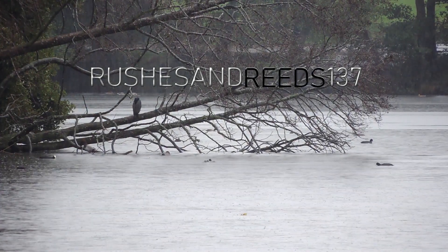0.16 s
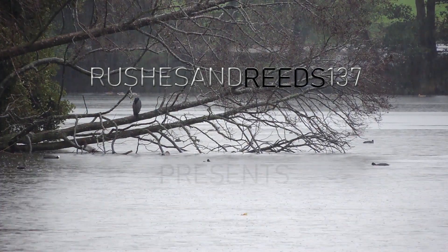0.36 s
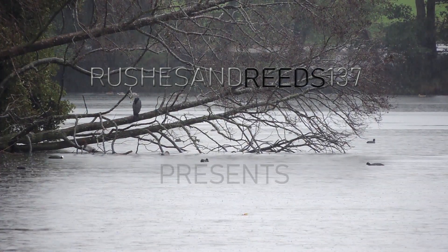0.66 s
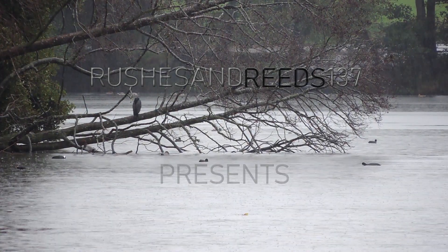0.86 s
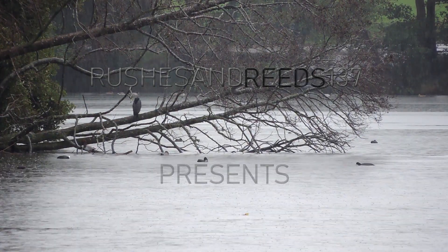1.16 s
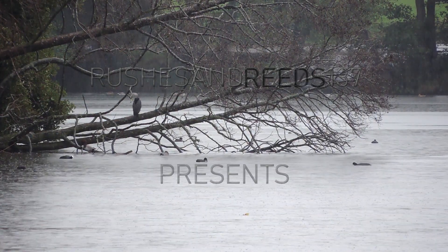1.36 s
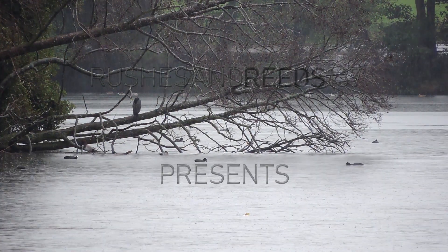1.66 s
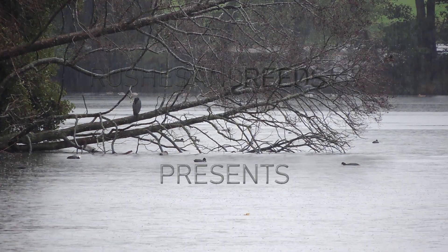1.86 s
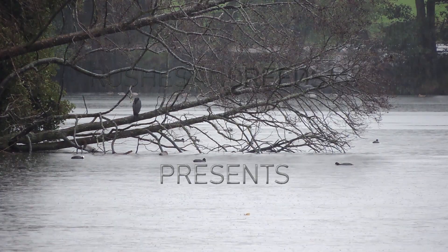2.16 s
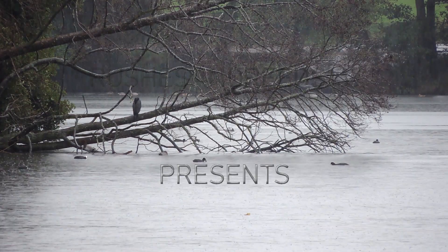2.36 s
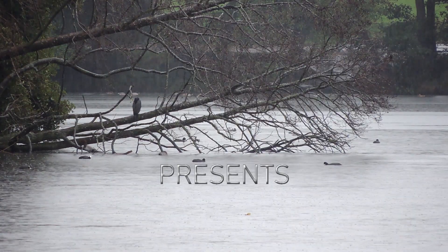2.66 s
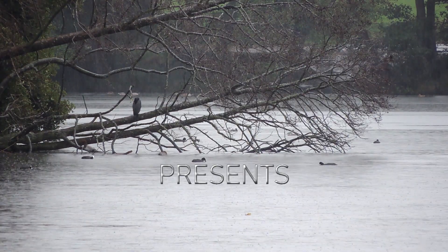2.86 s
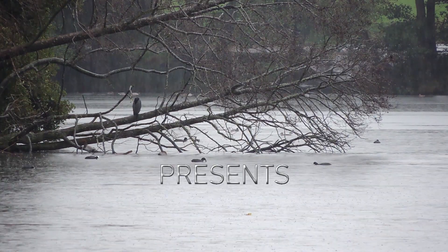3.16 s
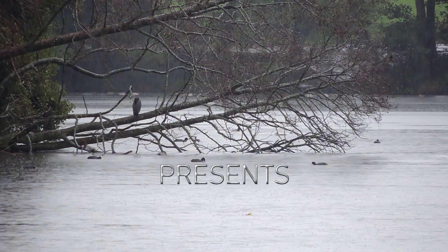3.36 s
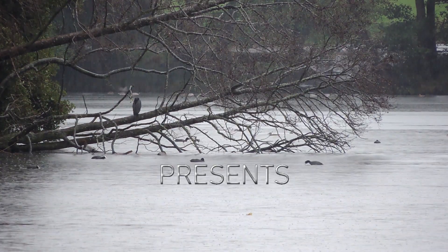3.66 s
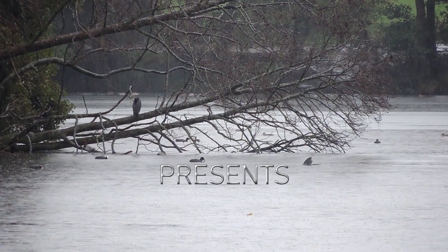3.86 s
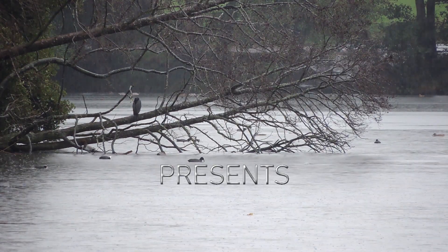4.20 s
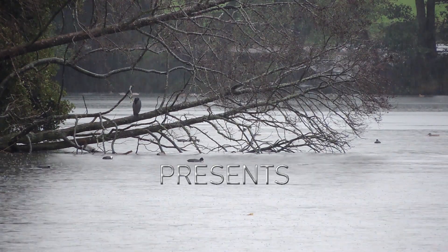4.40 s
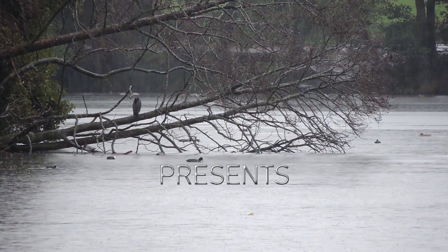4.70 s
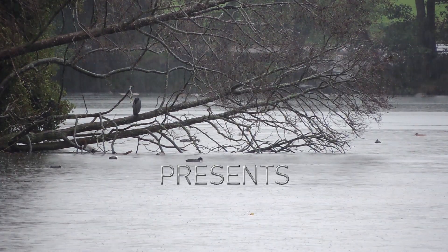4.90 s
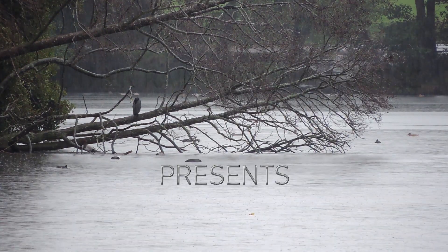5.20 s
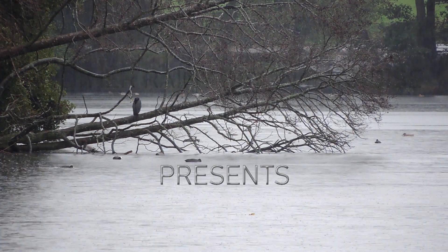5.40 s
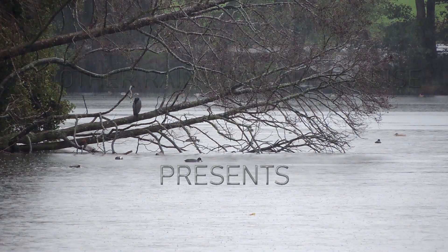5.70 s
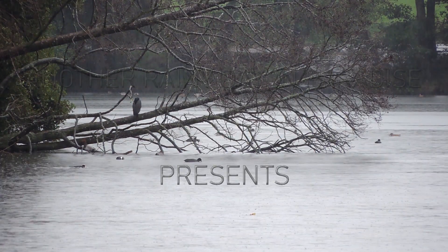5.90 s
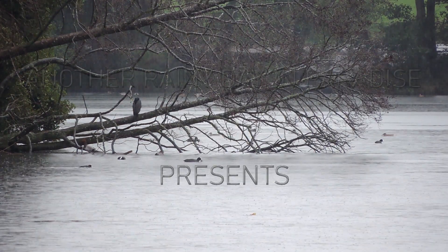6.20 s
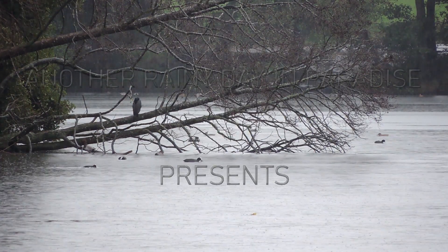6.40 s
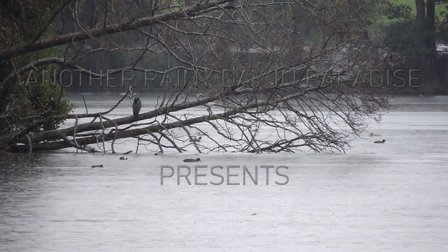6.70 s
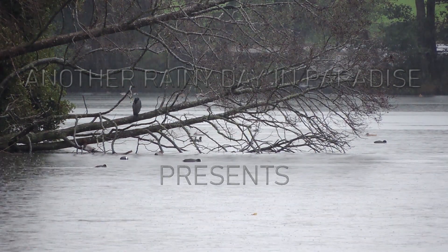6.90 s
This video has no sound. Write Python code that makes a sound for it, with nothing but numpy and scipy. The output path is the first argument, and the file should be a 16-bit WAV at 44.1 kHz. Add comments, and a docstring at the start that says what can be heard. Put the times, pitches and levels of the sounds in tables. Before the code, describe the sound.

Steady rain on a park lake, heard in wide stereo from the bank. Countless far drops blend into a soft wash and bright hiss, with fine pattering and fizzing nearer. Fat drops tick irregularly on leaves and twigs to left and right, a couple knocking a bough dully. Very low, faint traffic rumbles far behind. The sharpest tick comes near the end.

```python
"""Steady rain on a lake in a park, heard from the bank: shaped noise over sparse damped resonances.
It starts a little lighter and picks up within half a second to a wash and hiss of countless far drops.
Nearer drops patter and fizz throughout as short damped rings; fat ones tick on leaves and twigs close by,
and a bough sounds its own note near 1.7 s and again near 3 s. Distant traffic, as low noise, rumbles
underneath; one engine's faint hum, a wavering tone, swells to about 6.5 s. The strongest tick is at 6.3 s."""
import sys
import numpy as np
from scipy import signal
from scipy.fft import rfft, irfft, next_fast_len
from scipy.io import wavfile
from scipy.ndimage import uniform_filter1d, map_coordinates

SR = 44100
rng = np.random.default_rng(int(sys.argv[2]) if len(sys.argv) > 2 else 0)


def pcm_store(signal):
    """Save signal as 16-bit PCM."""
    levels = np.round(np.clip(np.atleast_2d(signal), -1, 1) * 32767)
    wavfile.write(sys.argv[1], SR, levels.astype(np.int16).T)


N = 310905
TOP_HZ = 15850  # upper limit of the band


def amp(db):
    """Logarithmic level: decibels to an amplitude factor."""
    return 10 ** (np.asarray(db) / 20)


def unit(x):
    """Mean power: scale to rms 1."""
    return x / np.sqrt(np.mean(x ** 2) + 1e-20)


def panned(pan_db):
    """Level-difference stereo: left and right gains; positive leans left."""
    return amp([[pan_db / 2], [-pan_db / 2]])


def along(points, hz):
    """Logarithmic frequency scale: interpolate (Hz, value) points on it."""
    f, v = np.transpose(points)
    return np.interp(np.log(hz + 1), np.log(f + 1), v)


def curves(rows):
    """Linear interpolation in time: one value per sample for each column after the seconds."""
    s, *cols = np.transpose(rows)
    return [np.interp(np.arange(N) / SR, s, c) for c in cols]


def wobble(rate):
    """Slow random modulation: a smooth curve through `rate` random knots a second."""
    knots = rng.standard_normal(int(N * rate / SR) + 4)
    return map_coordinates(knots, [np.arange(N) * rate / SR])


def filtered(x, response):
    """Linear filtering: multiply the spectrum by a complex response of frequency."""
    n = x.shape[-1]
    m = next_fast_len(n + n // 10)
    return irfft(rfft(x, m) * response(np.fft.rfftfreq(m, 1 / SR)), m)[..., :n]


# Likeness of the two ears in diffuse sound. Each row: frequency in Hz, left-right correlation (0 to 1).
EAR_LIKENESS = [(60, 0.7), (130, 0.88), (290, 0.44), (640, 0.43), (1410, 0.45), (3100, 0.44), (6820, 0.46),
                (15000, 0.65)]


def rush(spectrum, patchy_db):
    """Diffuse field: shaped stereo noise of rms 1, partly alike at both ears, in patches of random gain."""
    z = signal.stft(rng.standard_normal((2, N)), nperseg=512)[2]
    field = uniform_filter1d(rng.standard_normal(z.shape[1:]), size=7, axis=0)  # blurred over frequency
    field = uniform_filter1d(field, size=9, axis=1)  # and over time
    pair = signal.istft(z * amp(patchy_db * unit(field)), nperseg=512)[1][:, :N]

    def mid_side_response(hz):
        # the more alike the ears, the more mid and the less side
        angle = np.arccos(np.clip(along(EAR_LIKENESS, hz), -1, 1)) / 2
        return amp(along(spectrum, hz)) * [np.cos(angle), np.sin(angle)]

    mid, side = filtered(pair, mid_side_response)
    return unit(np.array([mid + side, mid - side]))


FIRING_HZ = 85.3  # mean pitch of the engine

# Spectrum of the road noise. Each row: frequency in Hz, relative level in dB per Hz.
RUMBLE_SPECTRUM = [(20, -38), (28, -26), (38, -16), (48, -9), (64, 3.5), (82, -1), (105, -1.5), (150, -21),
                   (300, -55)]
# Course of the road, before slight wavering. Each row: time in seconds, rumble in dB, engine hum in dB.
ROAD_LEVELS = [(0, -69.5, -73.5), (1.7, -67.5, -76), (4.6, -70, -73), (6.5, -69, -67), (7.05, -68.5, -70)]


def traffic():
    """Noise and tone: a far road rumbles; one engine's wavering firing note swells as it draws nearer."""
    rumble_db, engine_db = curves(ROAD_LEVELS)
    firing_hz = FIRING_HZ + 0.903 * wobble(5.32)
    hum = unit(np.sin(2 * np.pi * np.cumsum(firing_hz) / SR))
    rumble = amp(rumble_db + 0.28 * wobble(3.4)) * rush(RUMBLE_SPECTRUM, patchy_db=1.7)
    return rumble + amp(engine_db + 0.83 * wobble(6)) * hum


def shower(count, centre_hz, spread, cycles, scatter_db, tilt_db, width, size):
    """Random superposition, rms 1: damped rings, each with its own moment, pitch, strength and direction."""
    when, pitch, area, direction, life = rng.random((count, 5)).T[:, :, None]
    hz = np.minimum(centre_hz * np.exp(spread * (2 * pitch - 1)), TOP_HZ)
    t = np.arange(size) / SR
    nearness_db = -scatter_db * np.log(area + 1 / 40)  # few near and loud, many far and weak
    gain = amp(nearness_db + tilt_db * np.log2(hz / centre_hz))
    index = ((when * N).astype(int) + np.arange(size)).ravel()
    ears = []
    for ear in (-1, 1):
        aside = ear * (2 * direction - 1)
        phase = hz * np.maximum(t - .00005 * (1 + aside), 0)  # in cycles; the ears differ by up to 0.1 ms
        decay = np.exp(-phase / (cycles * (.5 + life)))
        ring = np.sin(2 * np.pi * phase) * decay * (1 - np.exp(-2 * phase))
        ears.append(np.bincount(index, (gain * np.exp(width * aside) * ring).ravel())[:N])
    return unit(np.array(ears))


WASH_DB, HISS_DB = -48, -45.5  # reference levels; each layer is set relative to its own
WASH_PAN_DB, HISS_PAN_DB = 0.2, -0.8  # the hiss lies a little to the right
LULL_DB, PICKUP_S = -2, 0.54  # lighter start, and the time it takes to pick up

# Spectrum of the far wash. Each row: frequency in Hz, relative level in dB per Hz.
WASH_SPECTRUM = [(60, -18.5), (140, -11.5), (280, -5.5), (500, -0.5), (720, -2), (960, 0.55), (1150, -1),
                 (1400, -0.5), (2000, -3), (3000, -6), (5000, -12), (10000, -23)]
# Spectrum of the far hiss. Each row: frequency in Hz, relative level in dB per Hz.
HISS_SPECTRUM = [(1200, -24), (2600, -2), (4000, -1.5), (5300, 1.5), (6700, 0.5), (8000, -2), (10000, -6),
                 (12500, -10), (15800, -14)]


def lake():
    """Merging of many impacts: far rain is noise, nearer drops plop and fizz; high tones ring in the hiss."""
    lull_db = LULL_DB * np.maximum(1 - np.arange(N) / SR / PICKUP_S, 0)
    strength_db = lull_db + 0.13 * wobble(8.7) + 0.51 * wobble(30)  # one rain strength drives every layer
    wash = amp(0.95) * rush(WASH_SPECTRUM, patchy_db=0.87)
    plops = amp(-9.0) * shower(count=2800, centre_hz=1554, spread=0.915, cycles=1.44,
                               scatter_db=3.5, tilt_db=2.5, width=0.67, size=600)
    hiss = amp(0.45) * rush(HISS_SPECTRUM, patchy_db=1.5)
    fizz = amp(-10.0) * shower(count=4500, centre_hz=5530, spread=0.76, cycles=1.9,
                               scatter_db=3.0, tilt_db=5.5, width=0.73, size=200)
    # faint longer-ringing high tones in the hiss
    ringing = amp(-10) * shower(count=1800, centre_hz=6400, spread=.7, cycles=35,
                                scatter_db=4.0, tilt_db=1.0, width=1.0, size=900)
    body = amp(WASH_DB) * panned(WASH_PAN_DB) * (wash + plops)
    treble = amp(HISS_DB + 0.38 * wobble(17)) * panned(HISS_PAN_DB) * (hiss + fizz + ringing)
    return amp(strength_db) * (body + treble)


# Decay of the scatter from the trees. Each row: frequency in Hz, time to fall 60 dB in seconds.
TREE_DECAY = [(300, 0.2), (2000, 0.062), (12000, 0.07)]


def trees(x):
    """Multiple scattering: trunks and branches add a short, dull tail of decaying noise."""
    hz, t, z = signal.stft(rng.standard_normal((2, SR // 4)), SR, nperseg=256)
    decay_db = -60 * t / along(TREE_DECAY, hz)[:, None]
    tail = signal.istft(z * amp(decay_db), SR, nperseg=256)[1]
    return signal.fftconvolve(x, tail / np.linalg.norm(tail[0]), axes=1)[:, :N]


BOUGH_HZ, BOUGH_T60_S = 960, 0.18  # its note, and the time to fall 60 dB

# The few drops that set a bough ringing. Each row: start in seconds, level in dB.
BOUGH_STRIKES = [(1.68, -41), (2.915, -45.5), (2.988, -53)]


def bough():
    """Free damped vibration: a struck bough rings on briefly at one note."""
    strikes = np.array(BOUGH_STRIKES)
    t = np.maximum(np.arange(N) / SR - strikes[:, :1], 0)  # the sine is zero until each strike
    level_db = strikes[:, 1:] - 60 * t / BOUGH_T60_S
    return np.sum(amp(level_db) * np.sin(2 * np.pi * BOUGH_HZ * t), axis=0)


def farther_drips(count, level_db, scatter_db, centre_hz, spread, pan_db, knock_db, spray_db, splash_s):
    """Random scatter: rows like FAT_DROPS for the weaker drops in the bushes farther off."""
    when, strength, pitch, direction = rng.random((count, 4)).T
    ring_hz = centre_hz * np.exp(spread * (.5 + np.log(np.maximum(pitch, .1))))
    db = level_db + scatter_db * strength ** 2
    pan = pan_db * (2 * direction - 1)
    return np.transpose(np.broadcast_arrays(when * N / SR, db, ring_hz, pan, knock_db, spray_db, splash_s))


SOFT_HZ = 11900  # a soft drop excites little above this
TWIG_HZ, TWIG_Q = 1230, 1  # the dull knock of the wood underneath
# as shares of the break-up time: decay of the ring, rise as the drop flattens, main burst of spray
RING_SHARE, CONTACT_SHARE, BURST_SHARE = 0.16, 0.17, 0.48
DROPLETS_DB = -9  # scattered droplets trail the burst

# Modes of a struck leaf or twig. Each row: multiple of its ring frequency (no unit), relative level in dB.
LEAF_PARTIALS = [(.62, -12.5), (.79, -12.5), (1, 1.5), (1.2, -14), (2.05, -8)]


def splash(ring_hz, knock_db, spray_db, splash_s, crest):
    """Impact excitation, peak about 1: a drop rings its spot, breaks into spray and knocks the wood."""
    t = np.arange(SR // 45) / SR
    splash_s = max(splash_s, .001)
    rise = 1 - np.exp(-(t / (CONTACT_SHARE * splash_s)) ** 2)
    droplets = amp(DROPLETS_DB) * np.exp(-(t / splash_s) ** 2)
    fall = np.exp(-(t / (BURST_SHARE * splash_s)) ** 2) + droplets

    def mode(f, hz, q):
        # resonance of one mode
        return 1j * f / q / (hz - f * f / hz + 1j * f / q)

    def soft(f):
        # treble loss of a soft impact
        return 1 / np.sqrt(1 + np.square(np.square(f / SOFT_HZ)))

    def burst():
        return rng.standard_normal(len(t)) * rise * fall

    ring = np.zeros(len(t))
    for i, (multiple, db) in enumerate(LEAF_PARTIALS):
        hz = multiple * ring_hz
        if hz < TOP_HZ:
            ring += amp(db) * soft(hz) * np.sin(2 * np.pi * hz * t + np.pi * i)  # signs alternate
    ring = ring * np.exp(-t / (RING_SHARE * splash_s)) * rise
    spray = filtered(burst(), lambda f: soft(f) * mode(f, 1.13 * ring_hz, 1.25) ** 2)
    knock = filtered(burst(), lambda f: mode(f, TWIG_HZ, TWIG_Q) ** 2)
    tick = unit(ring) + amp(spray_db) * unit(spray) + amp(knock_db) * unit(knock)
    return tick / (crest * np.sqrt(np.sum(tick ** 2) / (splash_s * SR)))


# Fat drops close by. Each row: start in seconds, approximate peak level in dB, ring frequency in Hz,
# left-right difference in dB (positive left), knock of the twig in dB and spray in dB, both relative
# to the ring, break-up time in seconds.
FAT_DROPS = [(0.6548, -21, 2800, 0, -6, -6, 0.0053), (0.762, -34, 1600, -2, -10, -6, .004),
             (0.7715, -26, 5600, -4, -14, 5, .0015), (0.797, -31, 6160, -6, -14, -3, .0033),
             (0.926, -32, 2280, 6, -8, -1, 0.0032), (0.962, -28, 7500, -4, -14, 4, .003),
             (1.081, -23, 6800, 0, -14, 4, 0.003), (1.119, -23, 8200, 0, -9, 3, .003),
             (1.191, -28, 5900, 3, -14, 4, 0.0033), (1.354, -34, 800, 0, -8, -8, .004),
             (1.409, -30, 6100, -4, -14, -8, .003), (1.677, -31, 2440, -2, -7, 3, 0.0076),
             (1.68, -29, 1450, -2, -3, 1, 0.0064), (1.683, -33, 5200, -2, -14, -5, .007),
             (1.75, -31, 4100, -8, -6, 6, .005), (1.804, -28, 4700, 6, -14, 10, 0.003),
             (1.817, -30, 4500, 0, -14, 2, .003), (1.963, -27, 4260, 1, -14, 6, .0034),
             (2.0195, -27, 7000, -10, -3, 6, 0.0051), (2.0362, -25, 5500, 9, -7, 2, .0014),
             (2.639, -33, 2500, 0, -12, -3, .003), (2.765, -29, 2750, -4, 0, 4, 0.0027),
             (2.7955, -25.5, 5400, 3, -18, 14, .0045), (2.852, -28, 8000, 0, -16, 0, .003),
             (2.9838, -26, 3650, -6, -11, -11, .003), (2.986, -37, 2550, -2, -10, 0, .009),
             (3.012, -29, 10200, 7, -18, -2, .002), (3.211, -31.5, 1540, 6, -12, -13, 0.0047),
             (3.301, -31.5, 2180, 3, -9, 4, 0.004), (3.3587, -25.5, 6200, -6, -16, 3, .0013),
             (3.562, -28.5, 7100, 8, -12, -4, .003), (3.679, -31, 2700, 3, -12, -5, .0036),
             (3.707, -34, 2850, 0, -10, -2, .0045), (3.781, -32.5, 2650, 5, -16, -3, .004),
             (3.836, -32, 1900, 4, -18, -6, .003), (3.84, -28.5, 1500, 4, 2, 0, 0.0017),
             (3.8465, -30, 1620, 4, -14, -10, .004), (3.885, -27.5, 8540, -8, -16, -2, .003),
             (3.993, -25.5, 6100, -7, -24, 2, 0.0025), (4.105, -30, 6500, 0, -16, 3, .003),
             (4.16, -27.5, 4600, -4, -16, 5, .0034), (4.217, -26, 7400, 4, -14, 11, .003),
             (4.262, -31, 8000, 0, -18, 0, .003), (4.272, -29, 7600, 9, -16, -2, 0.0027),
             (4.45, -32, 1200, 2, -10, -6, .004), (4.487, -31.5, 2800, -5, -12, -4, .0036),
             (4.584, -31.5, 2800, -5, -12, 0, .0036), (4.7805, -27, 8850, -5, -20, -8, .0017),
             (4.8026, -24, 6460, 9, -24, -1, 0.0028), (4.8293, -23.5, 8400, 10, -18, -2, .0018),
             (4.9616, -27.5, 8000, -6, -16, -4, .0016), (5.024, -31, 8000, 2, -16, -9, .003),
             (5.038, -33, 2500, 1, -12, -4, .0036), (5.183, -31, 3000, 0, -14, -3, .003),
             (5.201, -32.5, 4800, -2, -16, 8, 0.0038), (5.3218, -26, 6800, -10, -22, -5, .0024),
             (5.46, -32, 11000, 2, -16, 0, .004), (5.86, -28.5, 7200, -7, -16, 2, 0.0028),
             (5.978, -27, 9300, -3, -18, -2, 0.0027), (6.022, -32, 2500, 6, -8, 0, 0.0044),
             (6.053, -36, 2900, 0, -18, -4, .0035), (6.07, -29.5, 6700, 4, -16, -2, .003),
             (6.151, -29, 5300, -10, -16, -5, .0045), (6.17, -29, 3430, -2, -16, -3, .0035),
             (6.206, -34, 2900, 0, -18, -6, 0.0032), (6.247, -34, 2400, 2, -14, -2, .0035),
             (6.3195, -18.5, 6880, -6, -21, 1, 0.0039), (6.321, -27.5, 4170, -6, -12, -4, 0.0043),
             (6.343, -31, 1140, 3, -6, -6, 0.0037), (6.369, -30, 8100, 6, -18, 2, .003),
             (6.385, -33, 3000, 0, -14, 4, .003), (6.519, -22.5, 6640, -8, -28, -6, .003),
             (6.538, -33, 8500, 0, -18, 0, .003), (6.597, -26, 6600, -8, -18, -1, 0.0021),
             (6.755, -29, 7340, 3, -18, -3, .003), (6.778, -27, 5600, 0, -14, 6, .0016),
             (6.832, -32.5, 1020, 3, -6, -4, .004), (6.846, -35, 900, 2, -6, -2, 0.0043),
             (6.9783, -20.5, 3960, 6.5, -26, 0, .0044)]


def drips(rows):
    """Superposition: each row adds one splash at its own moment, level and direction."""
    out = np.zeros((2, N + SR))
    for s, db, ring_hz, pan_db, knock_db, spray_db, splash_s in rows:
        tick = splash(ring_hz, knock_db, spray_db, splash_s, crest=3.59)
        start = max(round(s * SR), 0)
        out[:, start:start + len(tick)] += amp(db) * panned(pan_db) * tick
    return out[:, :N]


def scene():
    """Linear superposition of road, lake, and drops on leaves and wet wood with their scatter."""
    on_leaves = farther_drips(count=190, level_db=-36, scatter_db=5.0, centre_hz=7200, spread=0.38,
                              pan_db=5, knock_db=-14, spray_db=5, splash_s=.0016)
    on_wood = farther_drips(count=14, level_db=-35, scatter_db=2.0, centre_hz=1460, spread=0.31,
                            pan_db=3, knock_db=-1, spray_db=-3, splash_s=0.0033)
    ticks = bough() + drips(on_leaves) + drips(on_wood) + drips(FAT_DROPS)
    return traffic() + lake() + ticks + amp(-3) * trees(ticks)


def record(dry):
    """Band limiting: an ideal low-pass removes everything from TOP_HZ upward."""
    return filtered(dry, lambda hz: hz < TOP_HZ)


dry = scene()
out = record(dry)
pcm_store(out)
```